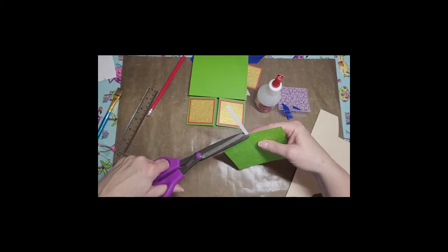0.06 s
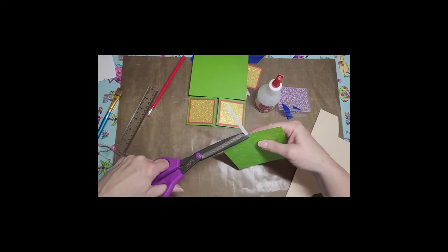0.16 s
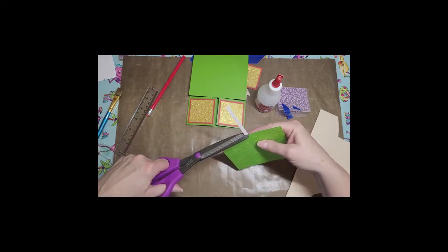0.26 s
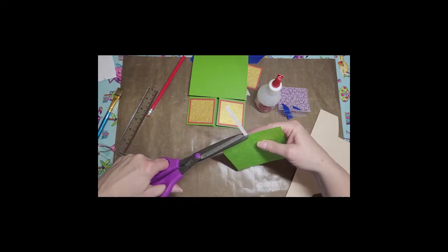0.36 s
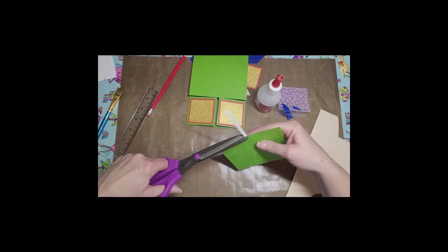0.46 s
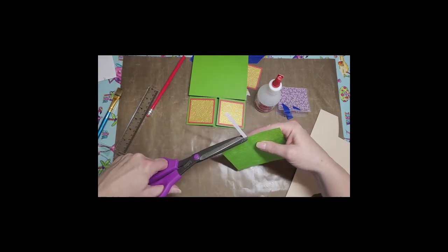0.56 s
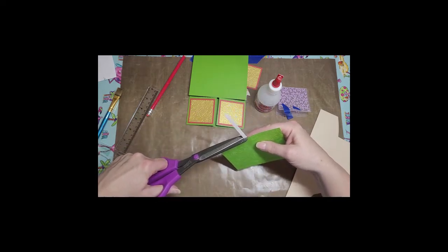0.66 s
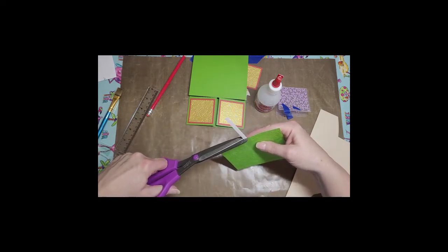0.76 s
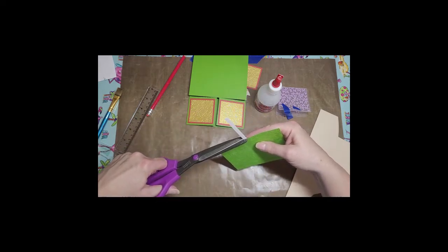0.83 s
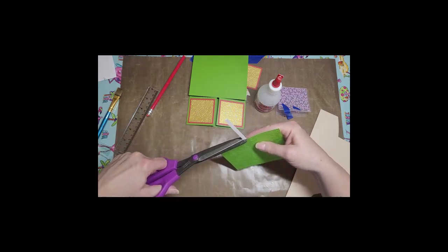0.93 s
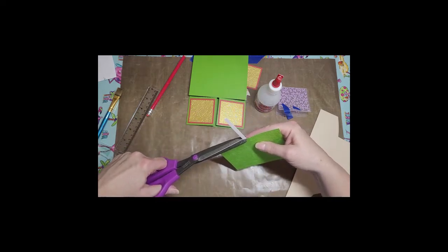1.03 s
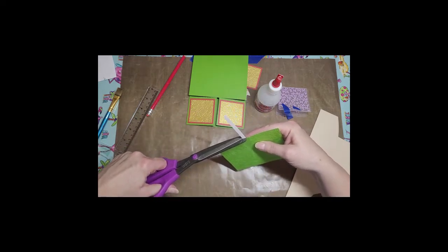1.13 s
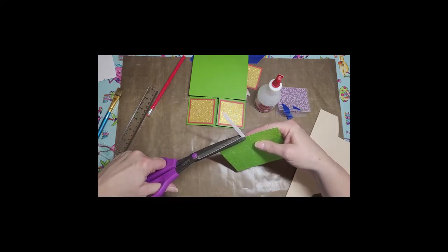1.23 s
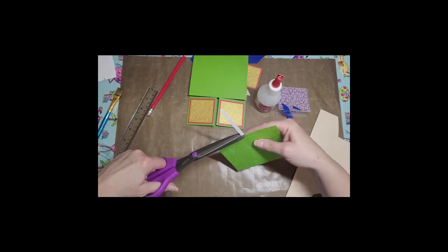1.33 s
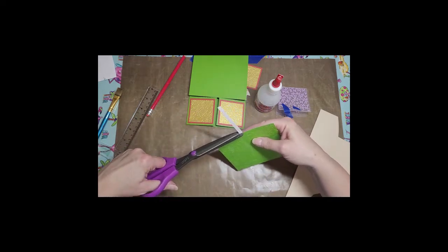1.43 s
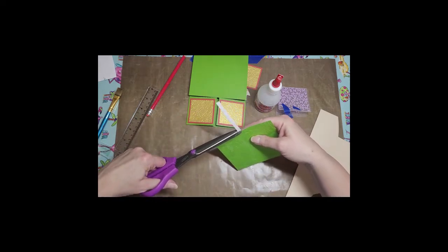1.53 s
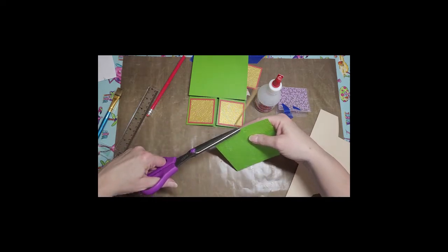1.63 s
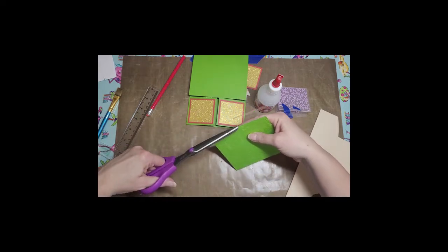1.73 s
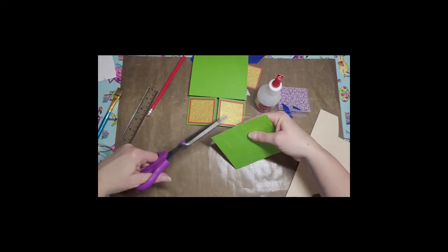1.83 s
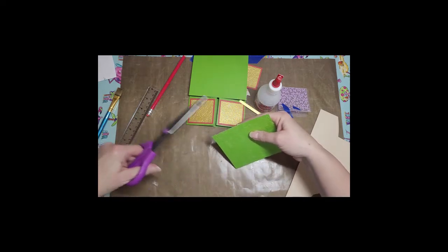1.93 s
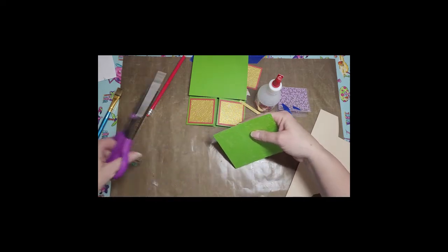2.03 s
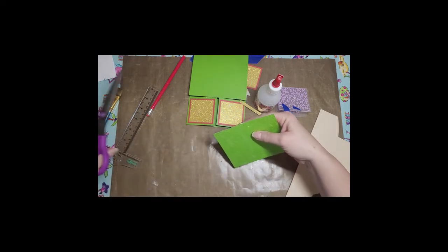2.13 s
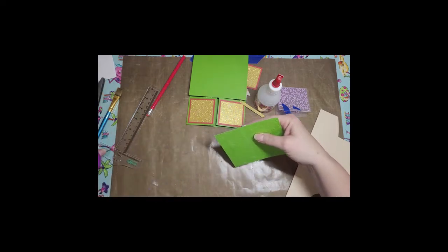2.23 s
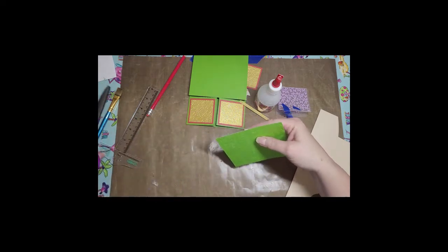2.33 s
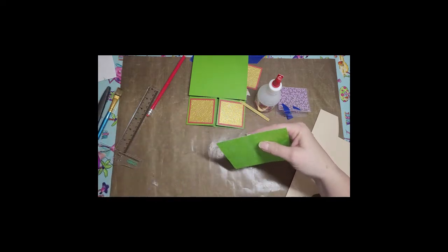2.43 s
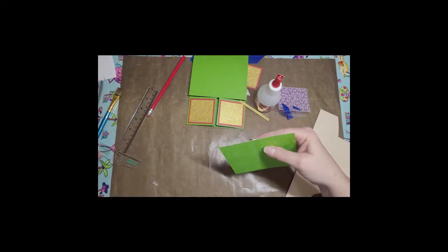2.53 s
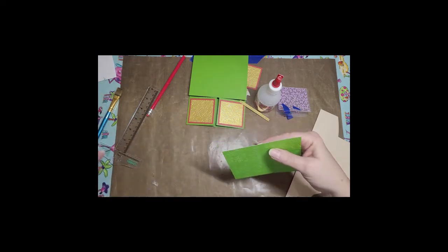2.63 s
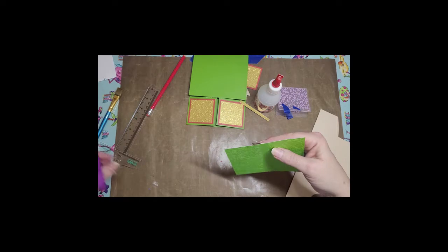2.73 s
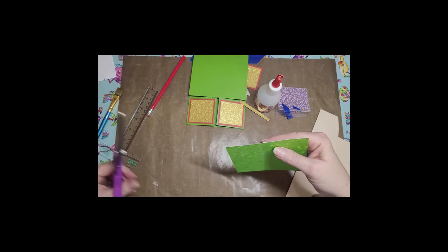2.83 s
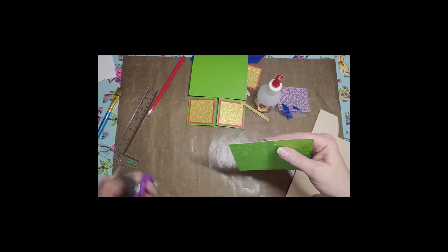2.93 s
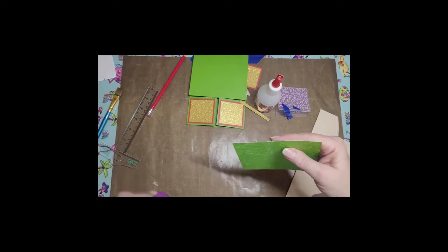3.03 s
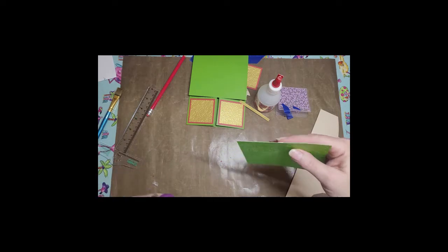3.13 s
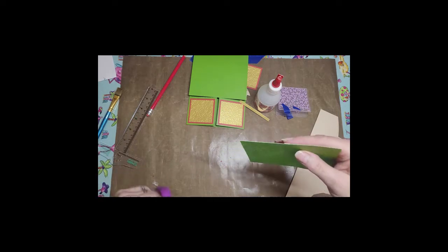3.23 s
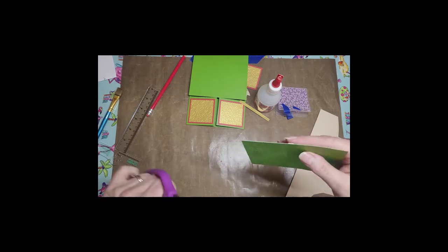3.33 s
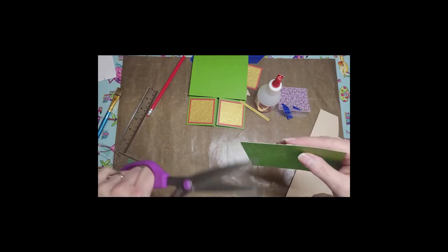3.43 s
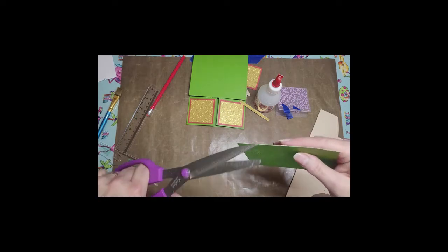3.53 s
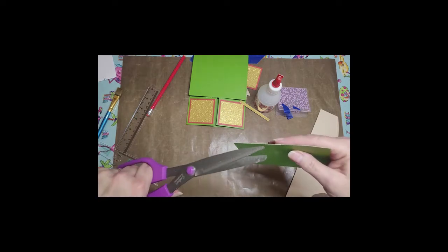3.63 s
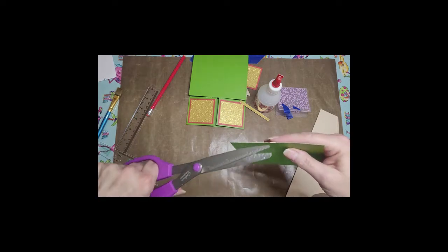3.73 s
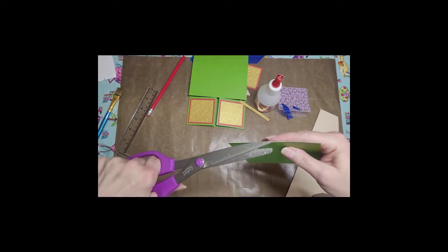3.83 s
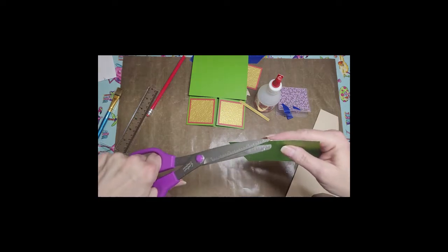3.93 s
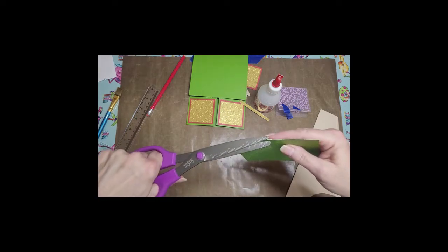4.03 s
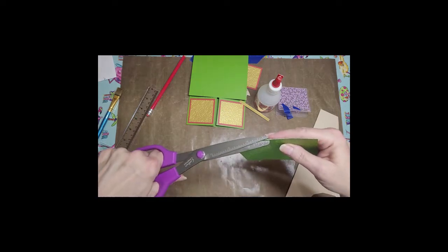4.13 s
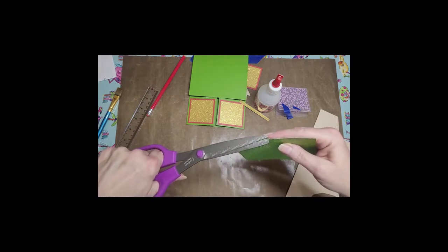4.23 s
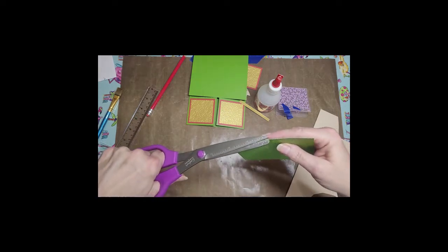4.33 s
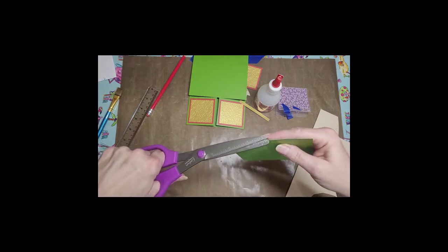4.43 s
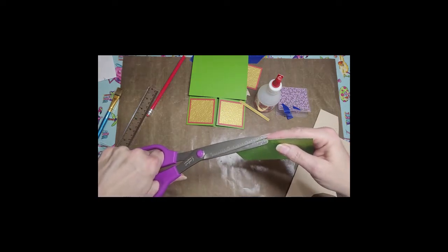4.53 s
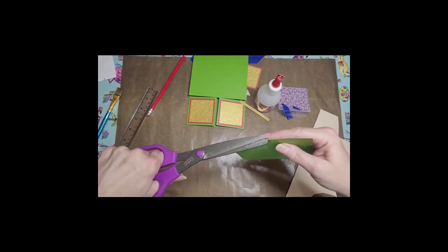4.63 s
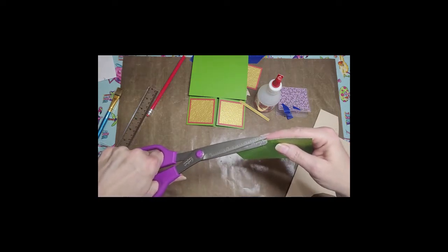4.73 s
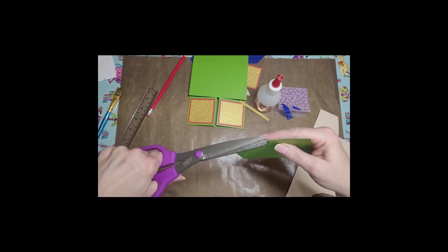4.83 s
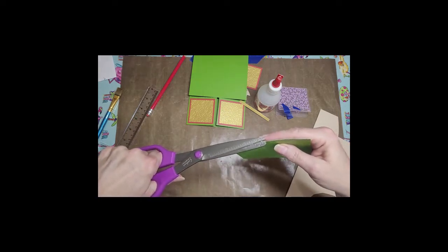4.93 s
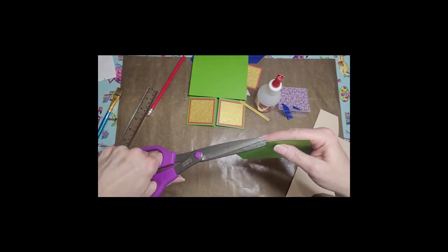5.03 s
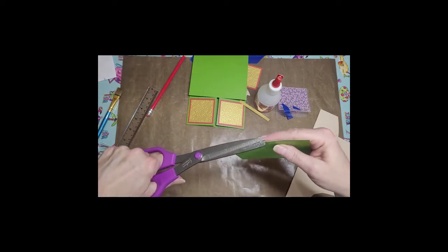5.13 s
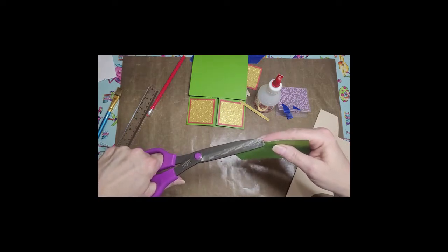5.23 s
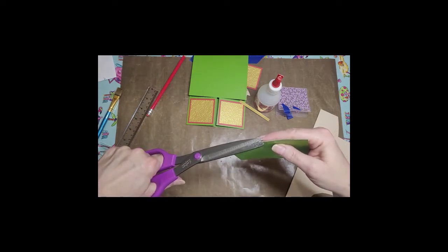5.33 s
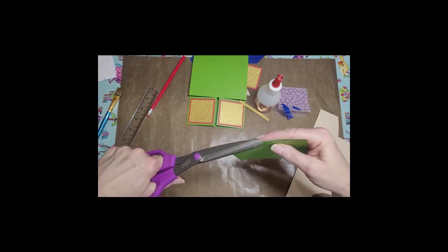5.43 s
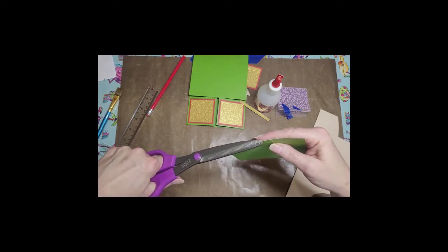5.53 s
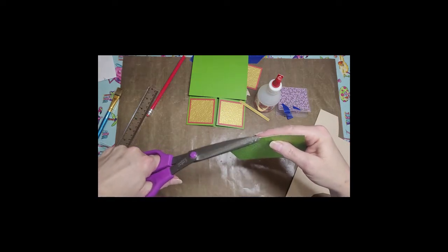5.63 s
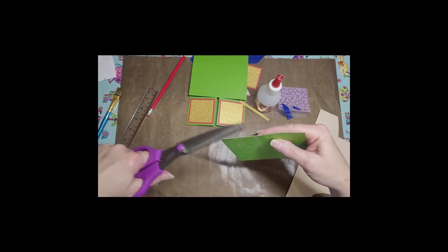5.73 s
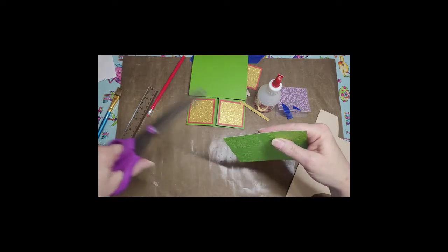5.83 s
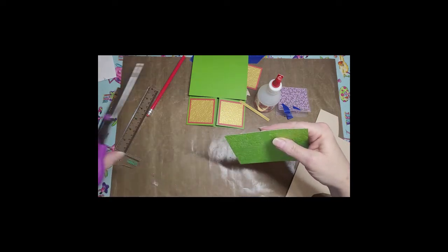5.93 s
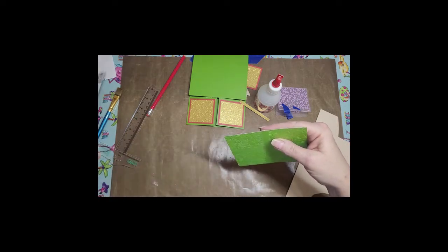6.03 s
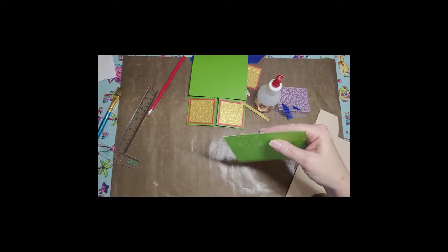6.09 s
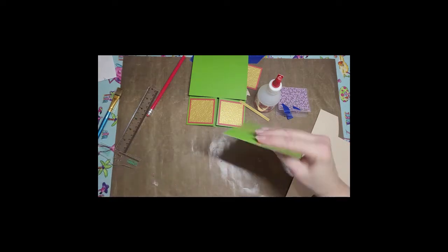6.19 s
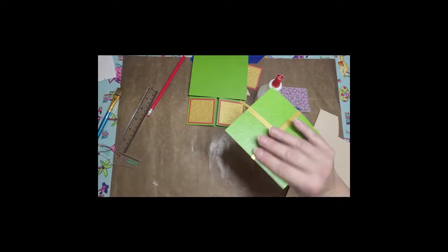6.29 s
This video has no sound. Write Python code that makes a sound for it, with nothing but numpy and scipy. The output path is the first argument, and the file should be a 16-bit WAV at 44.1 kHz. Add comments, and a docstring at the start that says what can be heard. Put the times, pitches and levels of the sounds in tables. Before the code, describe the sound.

In a quiet small room, two crisp scissor snips cut stiff card, separated by light ticks, a low table knock and dry card rubbing.

```python
"""Scissors cutting stiff card

Scissors snap shut twice through stiff card over a craft table in a small quiet room: cracks of noise and a faint
steel ring. An offcut drops and light contacts click, as short resonant cracks. Fingers slide on the card, as grainy
noise. The scissors' handles land on the table and ring its modes. A low hum, a wavering tone, follows the first
landing. Behind lie room tone and hiss, made of shaped noise, and a camera's thin high whine, made of steady lines.
"""
import sys
import numpy as np
from scipy import signal
from scipy.fft import rfft, irfft, next_fast_len
from scipy.io import wavfile
from scipy.ndimage import uniform_filter1d, map_coordinates

SR = 44100
rng = np.random.default_rng(int(sys.argv[2]) if len(sys.argv) > 2 else 0)


def materialize(psi):
    """Save the field psi as 16-bit PCM at rate SR to the path in sys.argv[1].

    A 1-D psi becomes a single channel; in a 2-D psi each row is a channel.
    """
    bounded = np.clip(np.atleast_2d(psi).T, -1, 1)
    quanta = np.round(bounded * 32767).astype(np.int16)
    wavfile.write(sys.argv[1], SR, quanta)


N = 280460  # length in samples

# Blades snapping shut, level before the room joins in:
# (time [s], level [dB], left minus right [dB], tilt [dB per octave])
SNIPS = [(1.5785, -3, -0.5, 0.24), (5.4571, -7, -1.5, -0.16)]
# Colour of the snap before its tilt: (frequency [Hz], relative level [dB])
BLADE_COLOUR = [(59, -63.5), (100, -27.5), (521, -25), (568, -29), (1060, -16.5), (1490, -15.5),
                (2490, -12), (3220, -12.5), (4840, -5.5), (5390, -11.5), (7440, -1.5), (8280, -6.5),
                (11700, 0.5), (15100, -1.5), (16800, -29.5)]
# Ring of the steel blades: (frequency [Hz], relative level [dB], time to fall 60 dB [s])
STEEL_MODES = [(1053, -19.5, 0.12), (1850, -19, 0.14), (2560, -15, .15), (3800, -15, .12), (4700, -7, .13),
               (6700, -5.5, 0.09), (7240, -9.5, 0.12), (8980, -5.5, .11), (11394, -7, 0.072),
               (11370, -6, 0.09), (12850, -5, .1), (15000, -9, .08)]
# Fingers and blades sliding on card; rise and fall each span 20 dB:
# (peak time [s], rise [s], fall [s], level before the hiss is lifted [dB], body against that level [dB])
STROKES = [(1.40, 0.16, .3, -85, -19), (1.53, .05, .04, -76, -10.5), (2.69, 0.22, .05, -68, -13),
           (2.728, .012, 0.1, -69.5, -15), (2.932, 0.036, .06, -57, -25.5), (3.05, 0.18, .4, -72.5, -20),
           (3.259, 0.014, .1, -59.5, -20), (3.35, 0.0092, 0.041, -71, -28.5), (3.54, 0.029, 0.2, -76, -8.5),
           (5.4, .02, 0.1, -83.5, -21), (5.98, .1, 0.14, -78, -16), (6.215, 0.037, .05, -69, -5.5),
           (6.31, 0.11, .4, -65.5, -14.5)]
# Colour of rubbed card: (frequency [Hz], relative level [dB])
CARD_COLOUR = [(2350, -61.5), (4000, -28), (6370, -13), (8540, -15), (9920, -14), (14700, -1),
               (15800, -9.5)]
# Duller body of the bending sheet: (frequency [Hz], relative level [dB])
SHEET_COLOUR = [(250, -30.5), (420, -1), (760, -5.5), (1050, -4), (1400, -5.5), (1900, -6.5), (3000, -11),
                (4300, -15), (6000, -38), (12000, -95)]
# Small contacts of card, blade and handle, level before the room joins in:
# (time [s], level [dB], centre [Hz], left minus right [dB], breadth [share of centre],
#  dull body against resonance [dB], room tail against contact [dB])
TICKS = [(0.166, -71, 7530, -4, 0.12, -8.5, 11), (.427, -69, 7450, -1.5, 0.34, -6.5, 11),
         (1.833, -36, 11300, -11, .4, -29, 2), (1.847, -24, 4180, 0, .9, -24.5, 0),
         (1.855, -35, 2500, -0.5, 0.61, -31.5, -3), (1.866, -40.5, 1800, 0, 0.17, -34, 1),
         (1.9, -35.5, 8600, -1, 0.5, -26, -5.5), (1.946, -37, 4186, 0.5, 1.0, -35, -2.5),
         (2.015, -55.5, 7400, -4, 0.3, -24, 0.5), (2.12, -67.5, 7570, -8.5, 0.13, -10.5, 9),
         (2.376, -36.5, 5600, -3.5, 1.94, -6.5, -1.5), (2.4051, -42, 4840, -6.5, 0.24, -4, -2.5),
         (2.416, -37.5, 5000, 0.5, 0.94, -9, -4.5), (2.684, -44, 6950, -9.5, 0.66, -21, 2.5),
         (2.688, -64, 1040, -1.5, 0.32, -21, 2), (2.724, -48, 12440, -2, 0.11, -24.5, 0.5),
         (2.91, -47.5, 12500, -2.5, 0.47, -29.5, -3.5), (3.257, -53, 6520, -3, 0.62, -27, 8),
         (3.334, -31.5, 13700, -4, 0.19, -37, -6.5), (3.336, -51, 5010, -1, 0.084, -31, -11),
         (3.535, -64, 12000, 0, 0.67, -11.5, -1), (4.125, -68, 2800, 3.5, 1.3, 15, 3),
         (4.16, -63.5, 6970, 1.5, 0.28, 4.5, 5.5), (4.205, -69.5, 4830, 3, 0.42, 0, -0.5),
         (4.382, -65.5, 2990, 2.5, 1.95, 10.5, 3), (5.575, -55, 1710, 0.5, 0.6, -9.5, -8.5),
         (6.185, -65.5, 5130, -5.5, 0.44, -9.5, 11.5), (6.294, -42.5, 5560, -7.5, 0.58, -32, -2.5),
         (6.329, -49.5, 4930, -4, 0.13, -33, -4), (6.344, -57, 4550, -8, 0.23, -23, -2)]
# Handles landing and bouncing, one list per landing: (time [s], strength [dB])
LANDINGS = [
    [(2.377, -44.5), (2.382, -32), (2.406, -37.5), (2.425, -41), (2.444, -55)],
    [(6.294, -45), (6.312, -48), (6.328, -42.5), (6.346, -51.5)],
]
# Modes of the table top: (frequency [Hz], relative level [dB], time to fall 60 dB [s])
TABLE_MODES = [(59.58, -14.5, 0.31), (104.4, -7, 0.087), (124.5, 1.5, 0.083), (172.8, -6.5, 0.23),
               (228.8, -4, 0.2), (302, -4.5, 0.14), (351, -3.5, 0.022), (420, -15, 0.082),
               (518, -10.5, 0.12), (594, -8.5, 0.11), (694, -20.5, 0.18), (774, -17.5, 0.14),
               (1109, -14, 0.044), (1366, -16, 0.073)]
# Middle of the hum's wavering pitch: (time [s], frequency [Hz])
HUM_PITCH = [(2.52, 130.5), (2.6, 140.7), (2.85, 148.3), (2.96, 141.7), (3.25, 132.7)]
# Colour of room tone and preamplifier hiss: (frequency [Hz], relative level [dB])
AIR_COLOUR = [(20, -18), (48, 1.5), (80, -5), (125, -5.5), (190, -14), (240, -4), (330, -8), (500, -13),
              (900, -22.5), (3000, -27), (7000, -29.5), (8400, -24), (9300, -30), (11900, -26.5),
              (13500, -26), (14500, -28.5), (15100, -20.5), (15700, -24), (15800, -71)]
# How alike the two channels of the air are: (frequency [Hz], likeness [-1 to 1])
AIR_LIKENESS = [(60, 0.63), (180, 1), (550, -0.26), (1650, 0.075), (4970, -0.25), (15000, -0.07)]
# Faint unsteady tones in the room tone: (frequency [Hz], width [Hz], level [dB])
TONES = [(48.4, 8, -83.5), (243.4, 11, -89), (11820, 60, -100)]
# Strong lines of the whine: (line number [count], left level [dB], right level [dB])
WHINE_LINES = [(7, -79, -78), (10, -77, -77), (11, -74, -81), (14, -78, -79), (16, -75, -83),
               (20, -78, -77), (21, -76, -75), (22, -71, -78), (24, -74, -85), (27, -73, -87),
               (28, -68, -82), (29, -76, -74), (30, -73, -74), (31, -74, -79)]
# Fading time of the room: (frequency [Hz], time to fall 60 dB [s])
ROOM_FADE = [(300, 0.26), (900, 0.24), (2000, 0.21), (5500, 0.24), (9000, .21), (14600, 0.13)]
# Echoes from the nearest surfaces: (delay [s], level [dB])
WALLS = [(.0047, -13), (.0085, -17), (0.0112, -14.5)]
# Microphone colour, with a bass roll-off and a dip from its housing: (frequency [Hz], gain [dB])
MIC_COLOUR = [(20, -8.5), (60, 0), (7500, 1.5), (8400, -5.5), (9300, 1), (15800, 2.5), (16600, -18)]

# Short hiss before each snap: its level (before the hiss is lifted), rise,
# body against that level, and how long before the snap it ends
LEAD_IN_DB, RISE_DB_PER_S, LEAD_IN_BODY_DB, LEAD_IN_ENDS_S = -54, 520, -21, .002
HISS_LIFT_DB = 4.0  # raises the bright part of all the grainy noise
FIRST_HZ, BOUNCE_HZ = 750, 390  # hardness of a landing's first contact and of its bounces
# Hum: start, length of its loud part, level and later fall
HUM_S, HUM_HOLD_S, HUM_DB, HUM_FADE_DB_PER_S = 2.565, 0.4, -74, 39
# Rougher band above the hum: centre, width, level against the hum
HUM_BAND_HZ, HUM_WIDTH_HZ, HUM_BAND_DB = 244, 55, -2.5
AIR_DB = -79
WHINE_HZ, REPEAT_HZ = 14709.75, 16.77  # base of the line numbers and spacing of the lines
WEAK_DB, WEAK_SCATTER_DB = -82.5, 2  # mean level and scatter of the weak lines
TOP_HZ = 17146  # the camera's band limit


def amp(db):
    """Gain of a level in dB."""
    return 10 ** (np.asarray(db) / 20)


def unit(x):
    """Scale x to an average strength (rms) of 1."""
    return x / np.sqrt(np.mean(x ** 2) + 1e-20)


def along(points, hz):
    """Read a curve of (frequency, value) points on a log frequency axis."""
    f, v = np.transpose(points)
    return np.interp(np.log(hz + 1), np.log(f + 1), v)


def filtered(x, response):
    """Multiply the spectrum of x by a response that depends on frequency."""
    m = next_fast_len(x.shape[-1] + 8192)
    spectrum = rfft(x, m) * response(np.fft.rfftfreq(m, 1 / SR))
    return irfft(spectrum, m)[..., :x.shape[-1]]


def band(centre_hz, width_hz):
    """Response that peaks at a centre and falls away on both sides."""
    return lambda hz: 1 / (1 + (2 * (hz - centre_hz) / width_hz) ** 2)


def causal(points):
    """Impulse response of energy 1 with a given colour, its energy as early as possible (minimum phase)."""
    cepstrum = irfft(np.log(amp(along(points, np.fft.rfftfreq(4096, 1 / SR))) + 1e-6))
    # fold the backward half of the cepstrum forward in time
    cepstrum[1:2048] *= 2
    cepstrum[2049:] = 0
    h = irfft(np.exp(rfft(cepstrum)))[:2048]
    return h / np.linalg.norm(h)


def tilted(points, db_per_octave):
    """Tilt a colour about 8 kHz."""
    return [(hz, db + db_per_octave * np.log2(hz / 8000)) for hz, db in points]


def resonance(hz, width_hz):
    """Impulse response of energy 1 of one damped mode, radiating little below its pitch."""
    t = np.arange(SR // 50 + 1) / SR
    h = np.diff(np.exp(-np.pi * abs(width_hz) * t) * np.sin(2 * np.pi * hz * t))
    return h / np.linalg.norm(h)


def wobble(rate):
    """A smooth curve through random points, rate points a second."""
    points = rng.standard_normal(int(N * rate / SR) + 4)
    return map_coordinates(points, [np.arange(N) * rate / SR])


def sides(pan_db):
    """Left and right gains, pan_db apart."""
    return amp([[pan_db / 2], [-pan_db / 2]])


def add(out, s, x):
    """Mix x into out from second s."""
    i = round(s * SR)
    out[:, i:i + x.shape[1]] += x[:, :out.shape[1] - i]


def in_room(x, colour, wet_db):
    """A sound, its first echoes, and a coloured random fading tail, fresh in each channel, from 2 ms on."""
    hz, t, z = signal.stft(rng.standard_normal((2, SR // 3)), SR, nperseg=256)
    # some bands last, others drop out
    bands_db = 2.5 * unit(uniform_filter1d(rng.standard_normal(z.shape[1:]), size=12))
    fade_db = -60 * t / along(ROOM_FADE, hz)[:, None]
    tail = signal.istft(z * amp(bands_db + fade_db), SR, nperseg=256)[1]
    tail = signal.fftconvolve(tail, colour[None], axes=1)
    tail = amp(wet_db) * tail * np.linalg.norm(x) / np.linalg.norm(tail)
    out = np.pad(tail, ((0, 0), (round(.002 * SR), SR // 2)))
    # the first pair is the direct sound
    for delay_s, db in [(0.00016, 0.00088)] + WALLS:
        add(out, delay_s, amp(db) * x)
    return out


def crack(length_s, alike):
    """A burst of noise that dies 60 dB within length_s, partly shared by both channels."""
    t = np.arange(SR // 50) / SR
    shared, left, right = rng.standard_normal((3, len(t)))
    share = np.clip(alike, 0, 1)
    noise = np.sqrt(share) * shared + np.sqrt(1 - share) * np.array([left, right])
    return noise * amp(-60 * t / length_s)


def snips():
    """The last fibres give way and the blades slam: a crack, brighter than its room tail, and a faint ring."""
    out = np.zeros((2, N))
    for s, db, pan_db, tilt_db in SNIPS:
        bright = causal(tilted(BLADE_COLOUR, tilt_db + 3.5))
        snap = signal.fftconvolve(crack(0.0074, alike=0.22), bright[None], axes=1)
        snap = snap / np.abs(snap).max()
        heard = in_room(snap, causal(tilted(BLADE_COLOUR, tilt_db)), wet_db=0.5)
        add(out, s + 0.00079, amp(db) * sides(pan_db) * heard)
        out = out + ring(s + 0.0013, db - 26.5)
    return out


def ring(s, db):
    """The steel blades ring from second s, each mode with a new strength and a wandering phase."""
    out, t = np.zeros((2, N)), np.arange(SR // 4) / SR
    for hz, level, t60 in STEEL_MODES:
        chance_db, turn = rng.normal(0, 3, size=(2, 2, 1))
        wander = .12 * np.cumsum(rng.standard_normal(len(t)))
        fading = amp(db + level + chance_db - 60 * t / t60)
        add(out, s, fading * np.sin(2 * np.pi * hz * t + turn + wander))
    return out


def rubs():
    """Fibres catch and slip as card is rubbed: dense uneven grains as a bright hiss and a duller body."""
    t = np.arange(N) / SR
    hiss, body = np.zeros(N), np.zeros(N)
    for s, rise_s, fall_s, db, body_db in STROKES:
        stroke = amp(db - 20 * np.maximum((s - t) / rise_s, (t - s) / fall_s))
        hiss, body = hiss + stroke, body + amp(body_db) * stroke
    # a brief hiss rises just before each snap
    for s, *_ in SNIPS:
        lead_in = amp(LEAD_IN_DB - RISE_DB_PER_S * np.abs(s - t)) * (t < s - LEAD_IN_ENDS_S)
        hiss, body = hiss + lead_in, body + amp(LEAD_IN_BODY_DB) * lead_in
    grains = rng.standard_normal((2, 2, N)) * amp(3.0 * wobble(350) + 2.2 * wobble(48))
    card = unit(filtered(grains[0], lambda hz: amp(along(CARD_COLOUR, hz))))
    sheet = unit(filtered(grains[1], lambda hz: amp(along(SHEET_COLOUR, hz))))
    return sides(1.5) * (amp(HISS_LIFT_DB) * hiss * card + body * sheet)


def ticks():
    """Each light contact is a short crack in a resonance of its own and the dull body of the sheet."""
    out, body = np.zeros((2, N)), causal(SHEET_COLOUR)[:SR // 50]
    for s, db, hz, pan_db, breadth, body_db, wet_db in TICKS:
        colour = resonance(hz, breadth * hz) - amp(body_db) * body
        # the more the sheet takes part, the longer the contact lasts, up to a limit
        length_s = 0.0055 + 0.019 * amp(min(body_db, 0))
        tick = signal.fftconvolve(crack(length_s, alike=0.28), colour[None], axes=1)
        tick = tick / np.abs(tick).max()
        add(out, s + 0.00077, amp(db) * sides(pan_db) * in_room(tick, colour, wet_db))
    return out


def knocks():
    """Each contact rings the table top; the harder first one of a landing reaches higher modes."""
    out, t = np.zeros((2, N)), np.arange(SR // 2) / SR
    for landing in LANDINGS:
        for k, (s, db) in enumerate(landing):
            hard_hz = BOUNCE_HZ if k else FIRST_HZ
            thud = np.zeros(len(t))
            for hz, level, t60 in TABLE_MODES:
                fading = amp(level + rng.normal(0, 2.6) - 60 * t / t60)
                thud += fading / np.hypot(1, hz / hard_hz) * np.sin(2 * np.pi * hz * t)
            thud *= 1 - np.exp(-t / 0.0022)  # soft start
            add(out, s, amp(db) * sides(-1.1) * in_room(np.array([thud, thud]), thud, wet_db=-3.5))
    return out


def hum():
    """A soft low tone of wavering pitch and level, with a rougher noise band, alike in both channels."""
    t = np.arange(N) / SR
    pitch_hz = np.interp(t, *np.transpose(HUM_PITCH)) + 5 * wobble(25)
    phase = 2 * np.pi * np.cumsum(pitch_hz) / SR
    fade_db = HUM_FADE_DB_PER_S * np.maximum(t - HUM_S - HUM_HOLD_S, 0)
    level = uniform_filter1d(amp(HUM_DB - fade_db) * (t > HUM_S), size=1500)
    rough = unit(filtered(rng.standard_normal(N), band(HUM_BAND_HZ, HUM_WIDTH_HZ)))
    loud_part = uniform_filter1d(1. * (t < HUM_S + HUM_HOLD_S), size=2000)
    tone = amp(3.8 * wobble(13)) * np.sqrt(2) * np.sin(phase)
    return level * (tone + amp(HUM_BAND_DB) * rough * loud_part)


def whine():
    """A buzz repeating at a steady rate is a comb of lines: a high electronic whine, unlike in each channel."""
    out, t = np.zeros((2, N)), np.arange(N) / SR
    strong = {line: dbs for line, *dbs in WHINE_LINES}
    for line in range(5, 33):
        weak_db = WEAK_DB + WEAK_SCATTER_DB * rng.standard_normal(2)
        start = rng.uniform(0, 2 * np.pi, size=(2, 1))
        turn = 2 * np.pi * (WHINE_HZ + line * REPEAT_HZ) * t
        out += np.sqrt(2) * amp(strong.get(line, weak_db))[:, None] * np.sin(turn + start)
    return out * amp(0.44 * wobble(14) + 0.78 * wobble(60))


def tones():
    """Narrow bands of noise, partly shared by both channels, heard as faint unsteady tones."""
    out = np.zeros((2, N))
    for centre_hz, width_hz, db in TONES:
        shared, left, right = filtered(rng.standard_normal((3, N)), band(centre_hz, width_hz))
        out += amp(db) * unit(shared + 1.6 * np.array([left, right]))
    return out


def air():
    """Room tone and hiss: shaped noise whose likeness between the channels changes with frequency."""
    def response(hz):
        # this angle splits the noise into a shared part and an opposed part
        turn = np.arccos(np.clip(along(AIR_LIKENESS, hz), -1, 1)) / 2
        return amp(along(AIR_COLOUR, hz)) * [np.cos(turn), np.sin(turn)]

    mid, side = filtered(rng.standard_normal((2, N)), response)
    return amp(AIR_DB + .8 * wobble(3.3)) * unit(np.array([mid + side, mid - side]))


def scene():
    """All sources together."""
    return snips() + ticks() + knocks() + rubs() + hum() + air() + tones() + whine()


def record(dry):
    """The microphone colours the sound, and the camera keeps nothing above its band limit."""
    return filtered(dry, lambda hz: amp(along(MIC_COLOUR, hz)) * (hz < TOP_HZ))


dry = scene()
out = record(dry)
materialize(out)
```